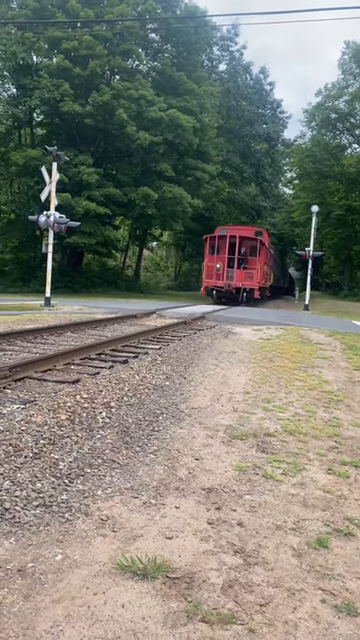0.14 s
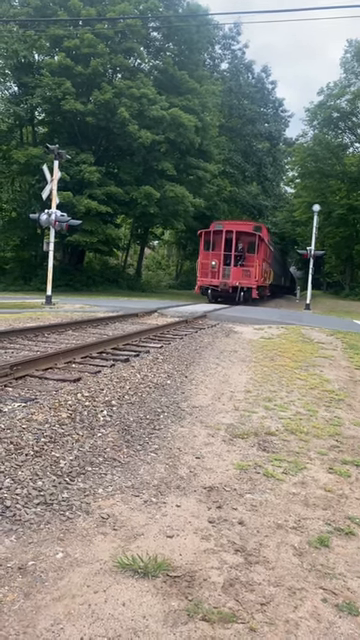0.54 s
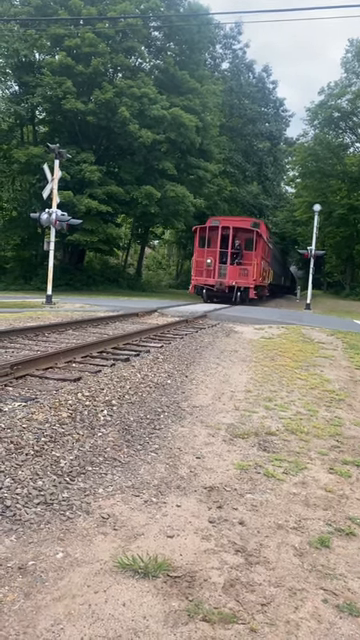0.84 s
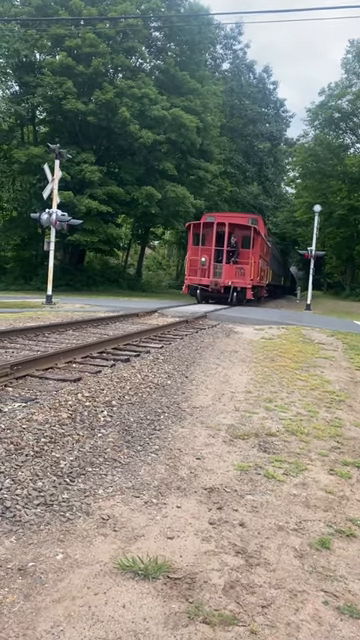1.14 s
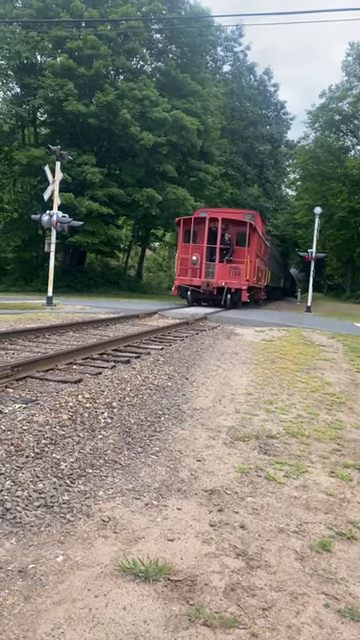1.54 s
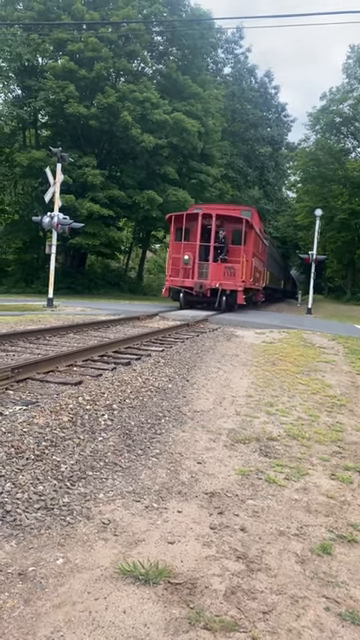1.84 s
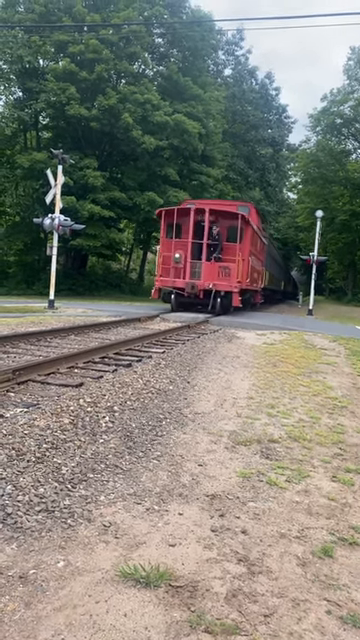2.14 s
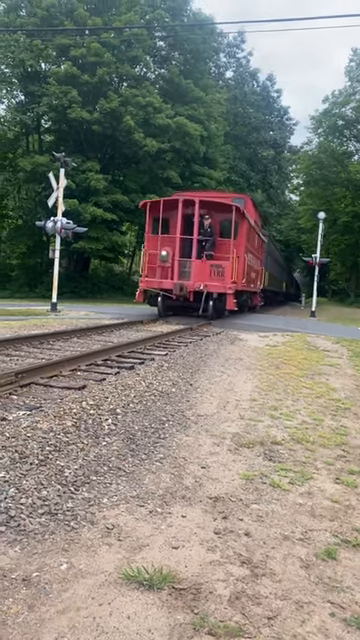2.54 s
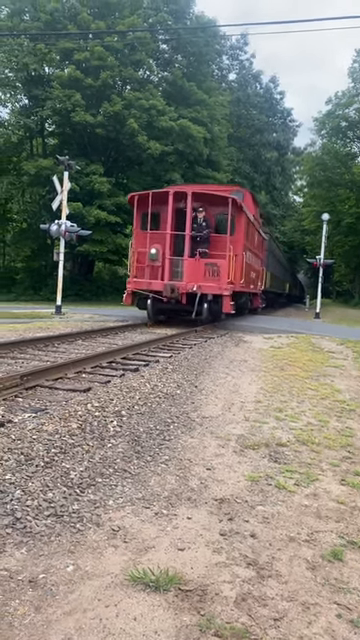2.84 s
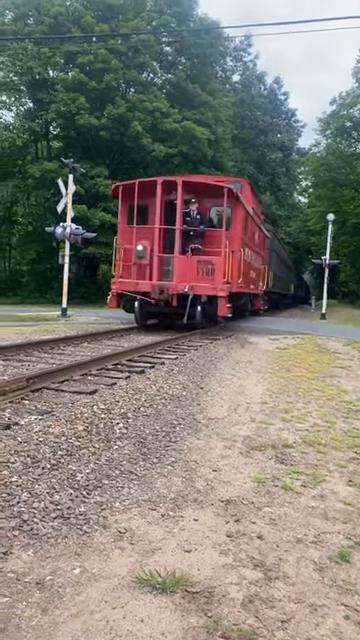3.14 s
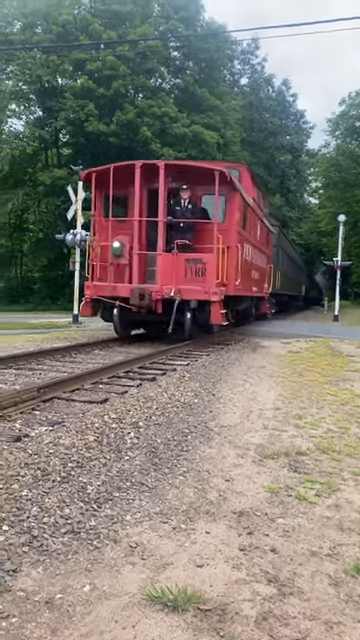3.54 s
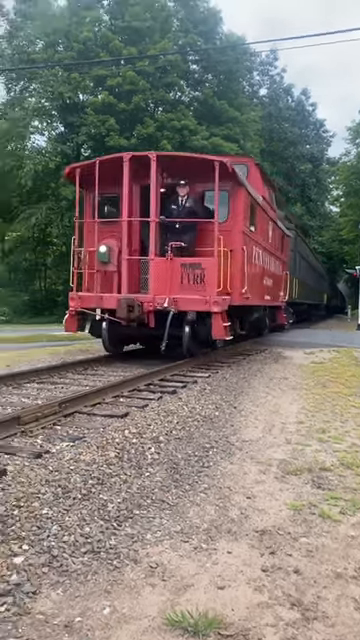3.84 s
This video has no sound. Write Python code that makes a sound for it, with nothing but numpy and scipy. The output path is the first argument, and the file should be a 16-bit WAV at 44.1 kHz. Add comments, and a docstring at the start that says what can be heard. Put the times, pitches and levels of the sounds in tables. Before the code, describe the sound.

A small train's air whistle blows twice, cracking between a hooting note and piercing squeal, while a crossing bell clangs steadily; then wheels thump and rumble nearer. Outdoors by trees, stereo handheld microphone beside the track.

```python
"""An air whistle gives two blasts, flipping between its low note and a shrill overblown one.
The whistle sums gliding sines with coloured noise, and trees return a faint noise-shaped echo of it.
A crossing bell, a sum of decaying modes, clangs about three times a second.
A train backs slowly over the crossing, caboose first: wheels thump over joints as damped, rough sines,
loose gear clanks in bands of noise, and the rolling, shaped noise, grows as the train nears."""
import sys
import numpy as np
from scipy import signal
from scipy.fft import rfft, irfft
from scipy.io import wavfile
from scipy.ndimage import uniform_filter1d

SR = 44100
rng = np.random.default_rng(int(sys.argv[2]) if len(sys.argv) > 2 else 0)


def transcribe(signal):
    """Save signal, clipped to [-1, 1], as a 16-bit WAV file at the path in sys.argv[1]."""
    frames = np.atleast_2d(signal).T
    limited = np.clip(frames, -1, 1)
    pcm = np.round(limited * 32767).astype(np.int16)
    wavfile.write(sys.argv[1], SR, pcm)


N = 176400
T = np.arange(N) / SR


def whistle():
    """Superposition: a stopped pipe sounds low notes, overblown notes and rushing air together."""
    return rushing_air() + low_notes() + shrill_notes()


# Low note, one curve per blast: time_s, pitch_hz, level_db
LOW_NOTES = [
    [(.02, 1292, -55), (.048, 1248, -22), (.11, 1252, -21), (.145, 1269, -23), (.18, 1303, -45)],
    [(1.225, 1290, -51), (1.25, 1245, -12.5), (1.3, 1240, -15.5), (1.41, 1261, -20.5), (1.455, 1288, -26),
     (1.49, 1293, -52), (1.535, 1289, -23.5), (1.565, 1267, -25.5), (1.59, 1259, -17), (1.66, 1248, -16.5),
     (1.8, 1241, -17.5), (1.92, 1248, -15), (2.01, 1252, -18), (2.064, 1290, -27.5), (2.09, 1287, -77)],
]
# Overtones of the low note: multiple, level_db, flutter (0-1), left_minus_right_db
OVERTONES = [(2, -23.5, 0.25, 3), (3, -12.5, 0, -8.5), (4, -26.5, 0, 11), (5, -13, 0.13, 1), (7, -25, 1, 0),
             (9, -36.5, 0.55, 0)]
LOW_JITTER, LOW_PAN_DB = 0.000083, 5  # pitch jitter as a fraction; left minus right
OVERTONE_GROWTH, REFERENCE_DB = 0.85, -14.5  # overtone dB per dB of the low note; level of equal gain


def low_notes():
    """Harmonic series: overtones are phase-locked to the low note and follow its loudness."""
    out = np.zeros((2, N))
    for rows in LOW_NOTES:
        phase, level = note(rows, LOW_JITTER)
        unsteady = 1 + .03 * wander(30)
        out += pan(LOW_PAN_DB) * np.sqrt(2) * level * np.sin(phase) * unsteady
        bright = amp(REFERENCE_DB) * (level / amp(REFERENCE_DB)) ** OVERTONE_GROWTH
        for multiple, db, flutter, side_db in OVERTONES:
            turn = multiple * phase
            in_phase = (1 + flutter * wander(32)) * np.sin(turn)
            quadrature = flutter * wander(38) * np.cos(turn)
            out += pan(side_db) * amp(db) * bright * np.sqrt(2) * (in_phase + quadrature)
    return out


# Overblown notes, one curve each: time_s, pitch_hz, level_db
SHRILL_NOTES = [
    [(0, 6320, -15), (.035, 6380, -15.5), (.055, 6530, -46)],
    [(.14, 6200, -22.5), (.17, 6410, -17.5), (.25, 6365, -19), (.3, 6270, -15), (.33, 6185, -21.5),
     (.36, 6330, -16), (.412, 6300, -14.5), (.445, 6070, -36)],
    [(1.16, 3620, -52), (1.195, 3743, -25.5), (1.235, 3800, -37)],
    [(1.155, 11700, -36), (1.19, 11900, -40), (1.24, 12400, -46)],
    [(1.195, 6200, -34), (1.225, 6460, -25), (1.245, 6500, -36)],
    [(1.205, 8400, -46), (1.238, 8530, -15.5), (1.258, 8650, -41)],
    [(1.425, 6330, -26), (1.46, 6300, -23.5), (1.52, 6423, -18.5), (1.555, 6360, -26)],
    [(2.065, 6140, -36), (2.088, 6270, -20), (2.128, 6320, -21), (2.165, 6120, -30)],
]
SHRILL_OCTAVE_DB, SHRILL_JITTER = -22, 0.0011  # octave relative to the note; jitter as a fraction


def shrill_notes():
    """Overblowing: the pipe jumps to high modes, each an unsteady sine with a weak octave."""
    out = 0
    for rows in SHRILL_NOTES:
        phase, level = note(rows, SHRILL_JITTER)
        octave = amp(SHRILL_OCTAVE_DB) * np.sin(2 * phase)
        unsteady = 1 + 0.21 * wander(52)
        out = out + np.sqrt(2) * level * unsteady * (np.sin(phase) + octave)
    return out


# Loudness of the air: time_s, level_db
AIR = [(0, -47), (.05, -34.5), (.15, -34), (.22, -39.5), (.41, -48), (.47, -81), (1.1, -53), (1.17, -39.5),
       (1.25, -34), (1.42, -36), (1.49, -36), (1.56, -32), (1.8, -31), (2.03, -34), (2.08, -43),
       (2.15, -34.5), (2.2, -101)]
# Spectrum of the hiss: frequency_hz, level_db
HISS = [(500, -10), (1200, -0.5), (3000, -6), (4300, -8.5), (5200, 7), (6800, -7), (8800, 6.5), (10500, -2),
        (12500, 1), (15500, -3)]
PIPE_HZ, PIPE_WIDTH_HZ, PIPE_DB = 1252, 110, -3.5


def rushing_air():
    """Resonance: turbulent hiss, with the pipe's third to fifth harmonics emphasised."""
    pipe = sum(band(k * PIPE_HZ, PIPE_WIDTH_HZ) for k in range(3, 6)) / 2
    return (noise(HISS, patchy_db=5.3) + amp(PIPE_DB) * pipe) * amp(curve(AIR))


def note(rows, jitter):
    """Frequency modulation: phase is the running sum of a jittered pitch; also gives loudness."""
    sounding = 1. * ((T >= rows[0][0]) & (T <= rows[-1][0]))
    gate = abs(uniform_filter1d(sounding, size=200))
    pitch = curve(rows) * (1 + jitter * wander(100))
    return 2 * np.pi * np.cumsum(pitch) / SR, gate * amp(curve(rows, axis=2))


# Strokes of the bell: start_s, clang_level_db, lowest_ring_level_db, higher_rings_level_db
STROKES = [(-.3, -6, 1, -4), (0.042, 0, -0.5, 1.5), (0.386, -3.5, 1, -7), (.702, -2.5, 1, 3),
           (1.057, -3.5, 2.5, 7.5), (1.407, -7, -2.5, 0.5), (1.742, -1.5, -28, 2),
           (2.096, -12.5, -40, -7.5), (2.448, -6, -8, -4), (2.778, 1, 0.5, 1.5), (3.039, 0, 8, -7),
           (3.37, -4.5, -22, 3), (3.719, -1.5, 3, 5.5)]
# Modes of the bell: frequency_hz, level_db, t60_s, left_minus_right_db
BELL = [(2084, -39, 2.28, -3), (2642, -43.5, 0.97, -12), (3256, -45, 0.71, 4), (3955, -54.5, 3, -33),
        (2150, -37, 0.32, 8), (3600, -32.5, 0.21, -8), (4230, -42.5, 0.23, -2), (4550, -35.5, 0.16, 15),
        (4810, -25.5, 0.18, -6), (5420, -36, 0.13, 7), (5630, -40.5, 0.46, -8), (5850, -38, 0.24, -1),
        (8260, -39, 0.32, 5), (8710, -39.5, 0.44, -2), (9658, -48, 0.22, -1), (10000, -49, .35, 0),
        (10700, -47.5, 0.39, 0), (11350, -45.5, 0.38, 1), (11440, -56, 0.27, 0), (11600, -43, 0.28, 0),
        (12750, -35, 0.25, 0)]
LONG_RING_S = .7  # modes with a longer t60 are lasting rings, the others are clang
BELL_RISE_S = 0.0059
BELL_FLUTTER, BELL_FLUTTER_HZ = 0.094, 16
CLANG_FLUTTER, CLANG_FLUTTER_HZ = 0.2, 60


def bell():
    """Modal synthesis: each stroke adds energy to lasting rings and to a short bright clang."""
    out = clapper()
    t = T[::32]
    for k, (hz, db, t60, side_db) in enumerate(BELL):
        lasting = t60 > LONG_RING_S
        power = 0
        luck = rng.standard_normal(len(STROKES))
        for (start, clang_db, lowest_db, higher_db), chance in zip(STROKES, luck):
            ring_db = higher_db if k else lowest_db
            size = amp((ring_db if lasting else clang_db) + 1.7 * chance)
            age = np.maximum(t - start, 0)
            decay = np.exp(-np.log(1000) * age / t60)
            power = power + (size * np.minimum(age / BELL_RISE_S, 1) * decay) ** 2
        level = np.sqrt(2 * np.interp(T, t, power))
        phase = 2 * np.pi * hz * T
        flutter, rate_hz = (BELL_FLUTTER, BELL_FLUTTER_HZ) if lasting else (CLANG_FLUTTER, CLANG_FLUTTER_HZ)
        ring = (1 + flutter * wander(rate_hz)) * np.sin(phase) + flutter * wander(rate_hz) * np.cos(phase)
        out += pan(side_db) * amp(db) * level * ring
    return out


# Spectrum of the clapper's scrape: frequency_hz, level_db
CLAPPER = [(1000, -10), (2500, -2), (4800, -11), (6500, 6.5), (11000, -10), (15500, -3)]
CLAPPER_DB, CLAPPER_T60 = -31, 0.23  # t60 in seconds


def clapper():
    """Impact noise: every stroke opens a quick, decaying envelope on a broadband scrape."""
    strokes = sum(amp(db) * blow(start, 0.0018, CLAPPER_T60) for start, db, _, _ in STROKES)
    return amp(CLAPPER_DB) * noise(CLAPPER, patchy_db=4) * strokes


# Wheels over rail joints: start_s, thud_level_db, thud_pitch_hz, knock_level_db
JOINTS = [(.485, -52, 268, -28), (.534, -37, 266, -41), (.689, -27.5, 226, -30), (0.743, -18, 127, -51),
          (1.101, -16, 120, -32), (1.127, -30, 169, -44), (1.928, -21.5, 98, -60), (2.087, -31, 152.3, -54),
          (2.234, -33, 261.6, -38), (2.278, -21.5, 123, -48), (2.8, -21, 211, -55),
          (2.903, -13.5, 285, -10), (2.932, -16.5, 200, -32), (3.1, -12, 302, -15), (3.153, -29, 136, -36),
          (3.252, -22, 187, -19.5), (3.279, -16.5, 171, -39), (3.447, -15.5, 301, -20),
          (3.472, -24.5, 242, -25.5)]
# Modes of the truck: multiple of the thud pitch, level_db
THUD = [(1, -0.5), (1.6, -9), (2.7, -17)]
# Spectrum of the thud's scattered tail: frequency_hz, level_db
THUD_SPREAD = [(30, -4), (80, -4), (260, -3), (420, -8), (700, -20), (2000, -70)]
# Spectrum of the knock's scattered tail: frequency_hz, level_db
KNOCK_SPREAD = [(150, -19), (450, 6.5), (800, -1), (1300, -3.5), (2000, -20), (5000, -34), (12000, -56)]
JOINT_RISE_S, THUD_T60, KNOCK_T60 = 0.00315, 0.28, 0.15  # all in seconds
THUD_SCATTER_DB, KNOCK_SCATTER_DB = -5.5, -2
KNOCK_SWELL_S, THUD_SWELL_S = 0.0043, 0.0075
# the rail carries treble fastest, so a knock falls in pitch
KNOCK_FROM_HZ, KNOCK_TO_HZ, KNOCK_FALL_S = 1146, 296, 0.00822


def joints():
    """Impact and dispersion: a wheel drops, a knock falls in pitch, a deep thud follows; both scatter."""
    thud_tail = amp(THUD_SCATTER_DB) * noise(THUD_SPREAD, patchy_db=2.5)
    knock_tail = amp(KNOCK_SCATTER_DB) * noise(KNOCK_SPREAD, patchy_db=3.5)
    out = np.zeros((2, N))
    for start, thud_db, thud_hz, knock_db in JOINTS:
        fall = np.exp(-np.maximum(T - start, 0) / KNOCK_FALL_S)
        falling_hz = KNOCK_TO_HZ + (KNOCK_FROM_HZ - KNOCK_TO_HZ) * fall
        knock = struck(start, falling_hz, KNOCK_SWELL_S) + knock_tail * blow(start, JOINT_RISE_S, KNOCK_T60)
        out += pan(3.3) * amp(knock_db) * knock
        truck = sum(amp(db) * struck(start + JOINT_RISE_S, k * thud_hz, THUD_SWELL_S) for k, db in THUD)
        out += amp(thud_db) * (truck + thud_tail * blow(start, THUD_SWELL_S, THUD_T60))
    return out


JOINT_ROUGH = 0.21  # rms pitch scatter as a fraction


def struck(start, hz, swell_s):
    """Heavy damping: a ring of rough pitch swells, then dies within a few swell times."""
    age = np.maximum(T - start, 0) / swell_s
    unsteady = unit(uniform_filter1d(rng.standard_normal(N), size=60))
    rough_hz = hz * (1 + JOINT_ROUGH * unsteady) * (age > 0)
    return (age * np.exp(1 - age)) ** 2 * np.sin(2 * np.pi * np.cumsum(rough_hz) / SR)


# Clanks of loose running gear: start_s, frequency_hz, width_hz, level_db, t60_s
CLANKS = [(2.985, 2100, 120, -25.5, .1), (3.014, 2250, 300, -15, .045), (3.034, 2180, 900, -23.5, 0.065),
          (3.034, 5600, 1500, -28, 0.059), (3.172, 1720, 800, -27, 0.12), (3.204, 2500, 900, -34, 0.051),
          (3.469, 2700, 900, -24, 0.042), (3.556, 1970, 89.5, -25, 0.22), (3.564, 2650, 150, -28, 0.095),
          (3.861, 4270, 2180, -27.5, 0.12), (3.921, 4830, 2200, -30.5, 0.09)]


def clanks():
    """Resonance: loose steel parts rattle as the truck jolts, each a decaying band of noise."""
    return sum(amp(db) * band(hz, width) * blow(start, 0.0013, t60)
               for start, hz, width, db, t60 in CLANKS)


# Loudness of the rolling: time_s, rumble_level_db, body_level_db
ROLL = [(0, -34.5, -39), (.45, -41, -41), (.55, -38, -37), (.8, -34, -34), (1, -38, -34), (1.2, -38, -33),
        (1.5, -36, -38.5), (2.15, -38.5, -38), (2.65, -37.5, -37), (2.85, -28, -28), (3.3, -28, -28),
        (3.55, -30, -28.5), (3.7, -35, -30), (4, -27, -31)]
# Loudness of steel on the rails: time_s, grind_level_db, sizzle_level_db
GRIND = [(0, -45, -58), (.52, -47, -56), (.6, -36, -48), (.69, -44.5, -46), (.8, -35, -41.5),
         (.92, -39.5, -45.5), (1.25, -38.5, -38), (1.6, -46, -62), (2.15, -44, -49), (2.4, -45, -55),
         (2.72, -45.5, -55.5), (2.77, -35.5, -45.5), (2.89, -36.5, -48.5), (3.02, -32, -30.5),
         (3.11, -34.5, -44), (3.2, -26.5, -31), (3.4, -39, -39.5), (3.51, -26.5, -34), (3.58, -31, -30),
         (3.64, -37.5, -47), (3.86, -37.5, -45), (4, -35, -46.5)]
# Spectra of the four layers: frequency_hz, level_db
RUMBLE_SHAPE = [(20, -29), (40, -1), (60, -0.5), (75, 14), (95, -7.5), (140, -6.5), (300, -52.5)]
BODY_SHAPE = [(50, -20), (120, -2), (240, -0.5), (400, -7.5), (650, -15), (1100, -20), (2000, -48),
              (5000, -70)]
GRIND_SHAPE = [(400, -13), (900, -6), (1400, 0), (2000, 0.5), (2600, -1), (3100, -7), (4000, -7),
               (5500, -18), (12000, -40)]
SIZZLE_SHAPE = [(2000, -20), (3900, -5.5), (5400, 3.5), (7000, -5), (9000, -5.5), (12500, -18), (14000, -7),
                (15500, -30)]


def rolling():
    """Amplitude-modulated noise: lumpy rumble of the cars and gritty grinding of wheels on steel."""
    rumble = noise(RUMBLE_SHAPE, patchy_db=1.0) * amp(curve(ROLL))
    body = noise(BODY_SHAPE, patchy_db=2.5) * amp(curve(ROLL, axis=2))
    grind = noise(GRIND_SHAPE, patchy_db=4.5) * amp(curve(GRIND))
    sizzle = noise(SIZZLE_SHAPE, patchy_db=8.5) * amp(curve(GRIND, axis=2))
    lumps = unit(amp(1.64 * wander(15)))
    grit = amp(0.72 * wander(61))
    return (rumble + body) * lumps + (grind + sizzle) * grit


ECHO_DB, ECHO_T60, ECHO_DELAY_S = -16, 0.63, 0.0051  # t60 in seconds


def trees(x):
    """Diffuse reflection: the edge of the wood convolves sound with a decaying tail of noise."""
    tail = (rng.standard_normal(N) * blow(ECHO_DELAY_S, 0.025, ECHO_T60))[:SR]
    tail = tail / np.linalg.norm(tail)
    return signal.fftconvolve(x, tail[None], axes=1)[:, :N]


# Likeness of left and right: frequency_hz, coherence (0-1)
LIKENESS = [(120, 1), (250, .993), (700, .9), (2400, .8), (4500, .7), (7500, .95), (15000, .85)]


def noise(shape, patchy_db=0):
    """Filtered noise: partly coherent stereo of a given spectrum with drifting patches, rms 1."""
    hz = np.fft.rfftfreq(2048, 1 / SR)
    a, b, c, d, patches = rng.standard_normal((5, len(hz), N // 512 + 5))
    same = np.clip(read(LIKENESS, hz), 0, 1)[:, None]
    left = a + 1j * b
    right = same * left + np.sqrt(1 - same ** 2) * (c + 1j * d)
    patches = uniform_filter1d(patches, size=7, axis=0)
    patches = unit(uniform_filter1d(patches, size=8, axis=1))
    z = np.array([left, right]) * amp(read(shape, hz)[:, None] + patchy_db * patches)
    return unit(signal.istft(z, nperseg=2048, noverlap=1536)[1][:, :N])


def band(hz, width_hz):
    """Resonance: white noise through one spectral peak, rms 1."""
    f = np.fft.rfftfreq(N, 1 / SR)
    peak = 1 / (1 + ((f - hz) / (width_hz * 0.78)) ** 2)
    return unit(irfft(rfft(rng.standard_normal(N)) * peak, N))


def wander(hz):
    """Low-pass filtering: random fluctuation mostly slower than hz, rms 1."""
    f = np.fft.rfftfreq(N, 1 / SR)
    return unit(irfft(rfft(rng.standard_normal(N)) / (1 + (f / hz) ** 4), N))


def blow(start, rise, t60):
    """Exponential decay: a quick linear rise and a fall of 60 dB per t60."""
    t = np.maximum(T - start, 0)
    return np.minimum(t / rise, 1) * np.exp(-np.log(1000) * t / t60)


def pan(db):
    """Constant power: left and right gains whose level difference is db."""
    return unit(amp([[db / 2], [-db / 2]]))


def curve(rows, axis=1):
    """Linear interpolation: one column of a table against time."""
    rows = np.array(rows)
    return np.interp(T, rows[:, 0], rows[:, axis])


def read(points, hz):
    """Logarithmic frequency: a spectrum interpolated on a log axis."""
    f, value = np.transpose(points)
    return np.interp(np.log(hz + 1), np.log(f + 1), value)


def amp(db):
    """Decibel law: level to amplitude gain."""
    return 10 ** (np.asarray(db) / 20)


def unit(x):
    """Root mean square: scales to rms 1."""
    return x / np.sqrt(np.mean(x ** 2) + 1e-20)


def scene():
    """Superposition: whistle with its echo, bell, wheels, clanks and rolling add."""
    call = whistle()
    return call + bell() + joints() + clanks() + rolling() + amp(ECHO_DB) * trees(call)


# Microphone colour: frequency_hz, level_db
MIC = [(12, -34), (25, -22), (38, 2), (12000, -1), (13500, -14.5), (15500, -5)]
# Phase between the microphone ports: frequency_hz, left_lead_rad
PORT_PHASE = [(20, 0), (2200, 0), (3150, .7), (3600, 0), (5000, 0), (5700, 1.1), (6300, 2.1), (7000, 2.9),
              (7600, 3.14), (8200, 3.5), (9000, 4.7), (10000, 6.2), (11300, 6.8), (12700, 8.9),
              (14000, 9.4), (16000, 9.5)]
EDGE_HZ = 15780  # upper band limit


def record(dry):
    """Linear filtering: microphone colour, a treble phase difference between two ports, a band limit."""
    hz = np.fft.rfftfreq(2 * N, 1 / SR)
    lead = read(PORT_PHASE, hz)
    turn = np.exp(.5j * np.array([lead, -lead]))
    ports = irfft(rfft(dry, 2 * N) * amp(read(MIC, hz)) * turn, 2 * N)[:, :N]
    low_pass = signal.firwin(511, EDGE_HZ, window=("kaiser", 9), fs=SR)
    return signal.oaconvolve(ports, low_pass[None], "same")


dry = scene()
out = record(dry)
transcribe(out)
```